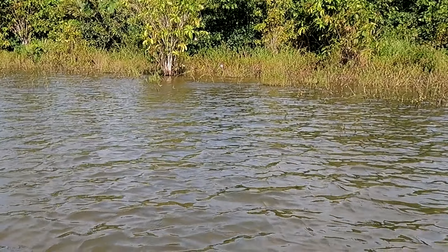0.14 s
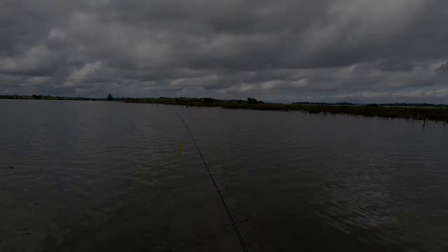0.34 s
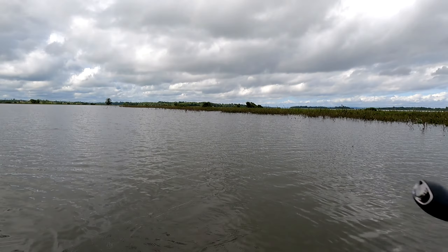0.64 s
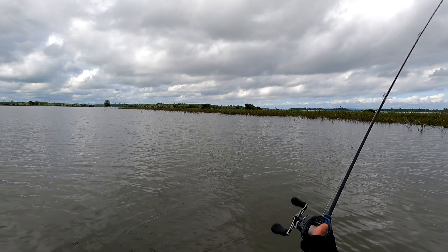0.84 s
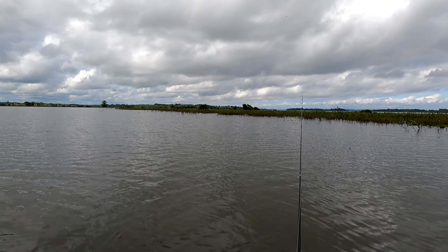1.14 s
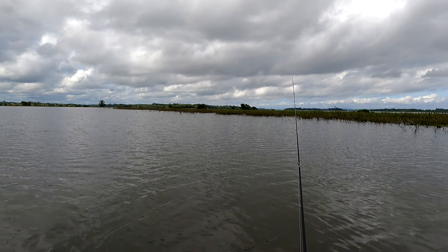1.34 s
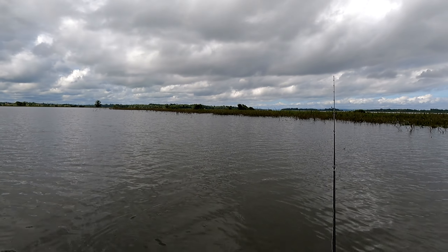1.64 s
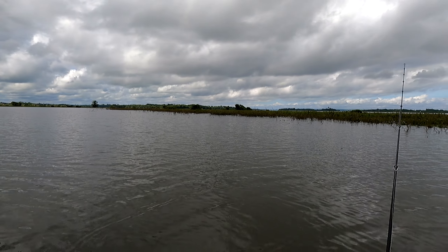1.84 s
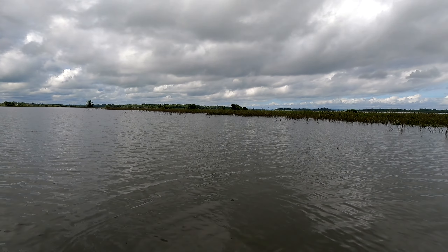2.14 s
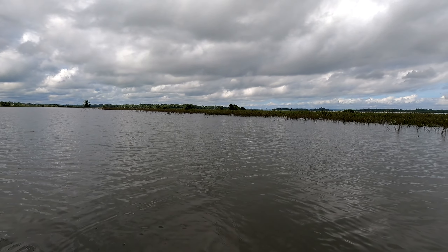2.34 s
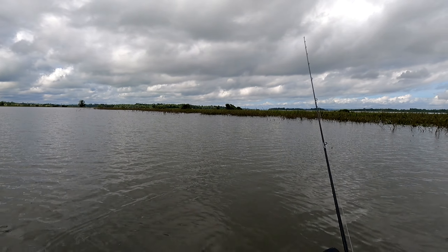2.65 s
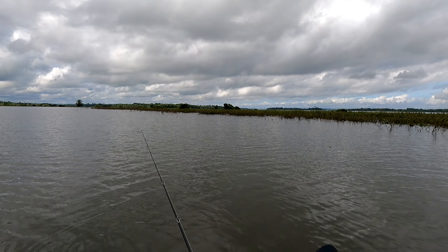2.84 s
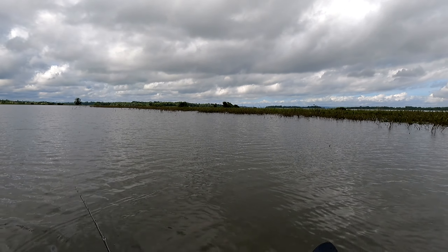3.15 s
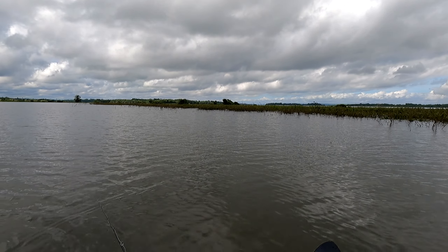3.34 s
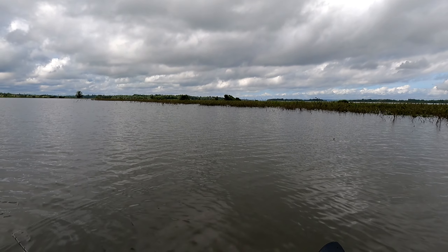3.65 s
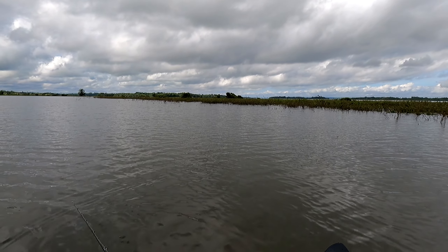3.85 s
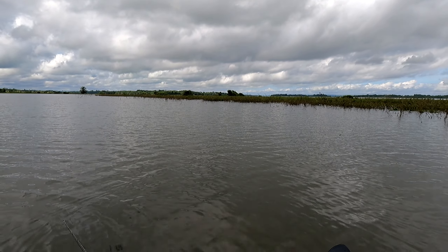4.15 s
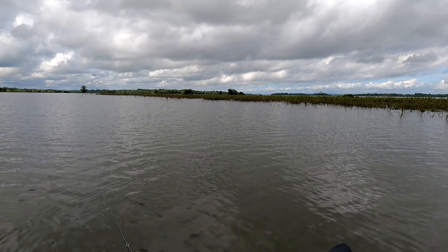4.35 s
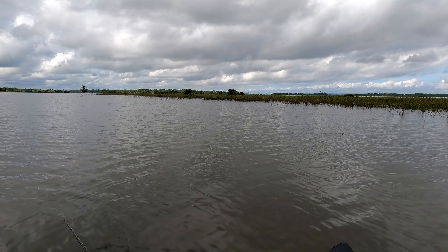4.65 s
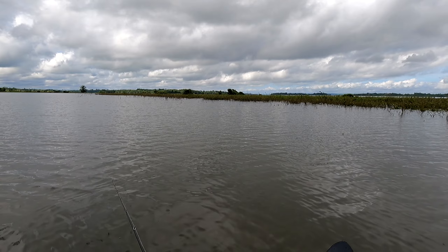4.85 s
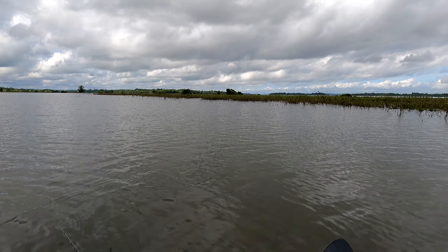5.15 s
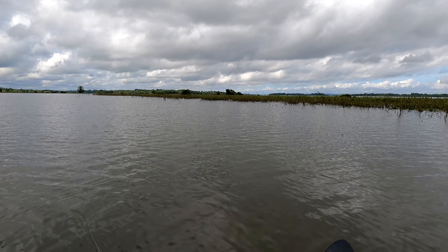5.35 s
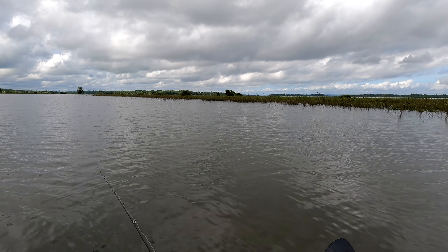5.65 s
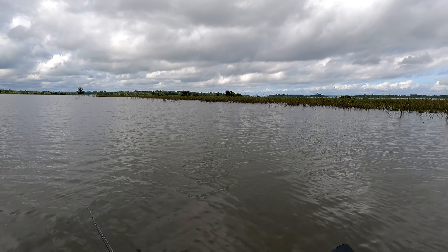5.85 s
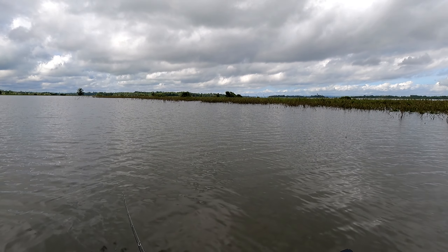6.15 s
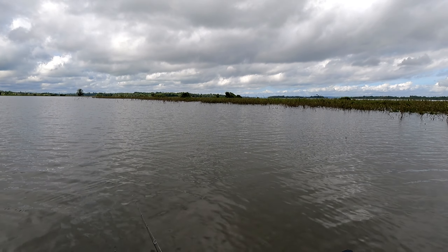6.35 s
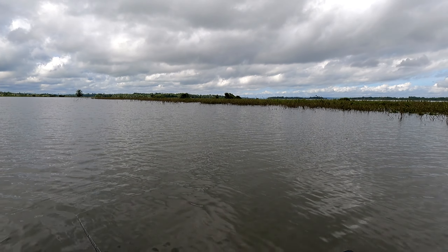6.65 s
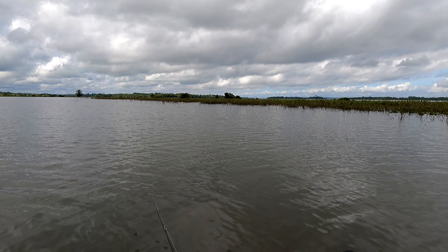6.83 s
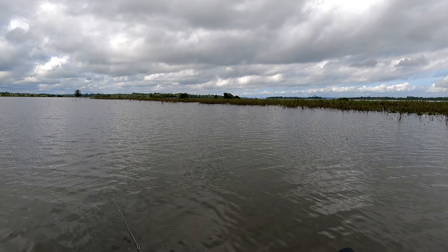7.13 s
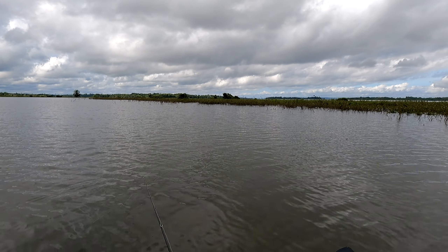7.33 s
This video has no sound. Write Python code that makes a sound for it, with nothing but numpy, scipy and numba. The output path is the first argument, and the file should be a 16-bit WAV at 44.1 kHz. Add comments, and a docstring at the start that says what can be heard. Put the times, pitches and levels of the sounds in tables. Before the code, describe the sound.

A rumbling wind buffet stops abruptly, then sleeve and rod rustle and swish, peaking in a sharp whoosh at the cast. The spool hisses brightly, fluttering lower as it slows, then stops with a dull patter. Sparse crisp ticks and one sharp click follow over a quiet lake. Later the reel rasps in short squeaky strokes, ending with a low hull knock. Close microphone, dry, outdoors.

```python
"""Casting a lure from a boat

An angler casts over a quiet lake. After a last gust on the microphone (shaped noise), sleeve and rod
swish (crackling noise bands) and the spool hisses as it slows (noise bands at multiples of its rate).
Line and tackle tick and patter (noise bursts, damped cycles), the reel rasps in short squeaky strokes
(resonant rubbing noise, gliding tones), knocks ring the hull's modes; lake and handling rumble lie below."""
import sys
import numpy as np
from scipy import signal
from scipy.fft import rfft, irfft, next_fast_len
from scipy.io import wavfile
from scipy.ndimage import uniform_filter1d
from numba import njit

SR = 44100
rng = np.random.default_rng(int(sys.argv[2]) if len(sys.argv) > 2 else 0)


def dump(signal):
    """Clip the signal to [-1, 1] and save it as 16-bit WAV at the path in sys.argv[1]."""
    limited = np.clip(np.atleast_2d(signal).T, -1, 1)
    pcm = np.round(limited * 32767).astype(np.int16)
    wavfile.write(sys.argv[1], SR, pcm)


N = 330309
T = np.arange(N) / SR  # s

# spectrum of cloth and bright ticks: (frequency [Hz], relative density [dB])
RUSTLE_SPECTRUM = [(24, -62), (40, -5.5), (124, 5), (588, -1), (701, -5), (775, 0.5), (1610, -9.5),
                   (2790, -12.5), (4610, -15), (7070, -8.5), (14700, -1), (16200, -8.5)]


def undb(db):
    """Amplitude of a level in dB."""
    return 10 ** (np.asarray(db) / 20)


def unit(x):
    """Scale to rms 1."""
    return x / np.sqrt(np.mean(x ** 2))


def curves(tables):
    """A gate open within the tables and 6 ms beyond, then their columns interpolated over time."""
    s, *columns = np.transpose([row for table in tables for row in table])
    inside = sum((T >= table[0][0] - .006) & (T <= table[-1][0] + .006) for table in tables) > 0
    return [inside] + [np.interp(T, s, c) for c in columns]


def colour(x, spectrum, lo_hz=1, hi_hz=1e6):
    """Shape x by (Hz, dB) points, kept between two steep edges."""
    size = next_fast_len(N)
    f = np.maximum(np.arange(size // 2 + 1) * SR / size, 1)
    hz, db = np.transpose(spectrum)
    shape = undb(np.interp(np.log(f), np.log(hz), db))
    edges = 1 / np.sqrt((1 + (lo_hz / f) ** 8) * (1 + (f / hi_hz) ** 8))
    return irfft(rfft(x, size) * shape * edges, size)[:N]


def walk(rate_hz):
    """Random levels, a new one every 1 / rate_hz, joined by straight slopes; spread near 1."""
    k = int(SR / rate_hz)
    held = np.repeat(rng.standard_normal(N // k + 1), k)
    return uniform_filter1d(held, k)[:N] * 1.15


def grains(rate_hz, spread_db):
    """Noise whose level jumps about: many tiny slips and creases."""
    return rng.standard_normal(N) * undb(spread_db * walk(rate_hz))


def swell(s, rise_s, fall_s):
    """Gain that is 20 dB down a rise before and a fall after its peak; both last at least 5 ms."""
    x = np.where(T < s, (s - T) / max(rise_s, .005), (T - s) / max(fall_s, .005))
    return undb(-20 * np.minimum(x, 8) ** 0.91)


@njit
def svf(x, hz, width):
    """Band-pass with a moving centre, gain 1 at the centre."""
    y, b, l = np.empty(len(x)), 0., 0.
    for i in range(len(x)):
        g, k = np.tan(np.pi * hz[i] / SR), width / hz[i]
        v = (b + g * (x[i] - l)) / (1 + g * (g + k))
        b, l, y[i] = 2 * v - b, l + 2 * g * v, k * v
    return y


def moves():
    """Creases crackle together in the upper bands, with random snaps; the air swish below is smoother."""
    # backswing and cast: (time [s], crisp rustle [dB], scrape [dB], air swish [dB])
    swing_rows = [
        [(0.32, -74, -67.5, -61.5), (0.42, -45.5, -53.5, -31), (0.526, -52.5, -41.5, -36),
         (0.588, -41.5, -35, -41.5), (0.73, -41, -40.5, -33.5), (0.818, -52, -45.5, -46.5),
         (0.86, -76, -68, -60)],
        [(0.86, -71, -63, -65), (0.944, -48.5, -43.5, -32), (1.048, -27, -18.5, -26), (1.088, -48.5, -51, -36),
         (1.13, -35, -31.5, -32.5), (1.18, -43, -44.5, -38.5), (1.248, -42.5, -41, -35),
         (1.452, -52.5, -45, -43), (1.52, -76, -59.5, -60)],
    ]
    # small shifts of arm and sleeve:
    # (peak [s], rise [s], fall [s], crisp rustle [dB], scrape [dB], air swish [dB])
    shift_rows = [(2.124, 0.12, 0.59, -67, -61.5, -56), (2.68, 0.12, 0.013, -63, -75, -43.5),
                  (2.792, 0.043, 0.043, -82, -87, -52), (3.034, 0.14, .12, -52, -56, -46),
                  (3.388, 0.033, 0.034, -40.5, -45, -42), (3.57, 0.048, 0.084, -62.5, -55.5, -52.5),
                  (4.066, 0.46, 0.29, -71.5, -64, -81), (4.65, 0.18, 0.35, -81, -70, -64),
                  (5.026, 0.13, 0.11, -71, -58.5, -62), (5.296, 0.28, 0.13, -73, -64.5, -59),
                  (6.66, .05, 0.19, -66, -62, -53.5), (6.85, 0.27, 0.53, -65, -57.5, -76),
                  (7.124, 0.32, 0.04, -66, -58.5, -62)]
    # faint stir between them: (time [s], crisp rustle [dB], scrape [dB], air swish [dB])
    stir_rows = [(1.5, -59, -59, -58.5), (2.25, -56, -62.5, -58), (2.6, -63, -61.5, -61.5),
                 (2.72, -69, -64, -56), (4.4, -84.5, -70, -69), (5.4, -81, -69, -71),
                 (7.49, -84, -72.5, -64)]
    base_hz, base_scrape_db, db_per_octave = 524, -43.5, 17
    snaps_per_s, snap_decay_s = 45, 0.0018

    swinging, *swing_db = curves(swing_rows)
    resting, *stir_db = curves([stir_rows])
    gain = swinging * undb(swing_db) + resting * undb(stir_db)
    for s, rise_s, fall_s, *db in shift_rows:
        gain = gain + undb(db)[:, None] * swell(s, rise_s, fall_s)

    snaps = (rng.random(N) < snaps_per_s / SR) * undb(np.minimum(4 * rng.exponential(size=N), 8))
    snaps = signal.lfilter([1], [1, -np.exp(-1 / (snap_decay_s * SR))], snaps)
    creases = grains(260, 0.57) * (1 + 1.06 * snaps)
    crisp = colour(creases, RUSTLE_SPECTRUM, 4500)
    crisp = crisp / np.std(colour(creases, RUSTLE_SPECTRUM, 2400, 8330))
    scrape = unit(colour(creases, RUSTLE_SPECTRUM, 1250, 4800))

    # the harder the swing (louder its scrape), the higher its swish
    swish_hz = base_hz * 2 ** (np.maximum(swing_db[1] - base_scrape_db, -8) / db_per_octave)
    air = grains(70, 1.9)
    bands_hz = [(45, 208), (250, 450), (600, 1200)]
    swish = unit(sum(undb(2.4 * walk(11)) * colour(air, RUSTLE_SPECTRUM, *band) for band in bands_hz))
    swish = unit(swish + 1.27 * unit(svf(air, swish_hz, 420.0)))
    return gain[0] * crisp + gain[1] * scrape + gain[2] * swish


def spool():
    """Bands at multiples of the slowing bearing rate stand out of the hiss, which throbs twice a turn."""
    # free run: (time [s], bearing rate [Hz], hiss [dB])
    run_rows = [(1.1, 1523, -70), (1.2, 1478, -42), (1.4, 1375, -37), (1.55, 1298, -42), (1.8, 1053, -39.5),
                (2.0, 928, -40.5), (2.12, 868, -37.5), (2.25, 830, -45), (2.55, 722, -54.5),
                (2.62, 705, -77)]
    # hiss colour: (frequency [Hz], relative density [dB])
    body_spectrum = [(3820, -38), (6500, -43), (6910, -22), (9170, 1), (10600, -6), (12100, 2),
                     (13100, -2.5), (14600, -7), (15100, -8), (16200, -23)]
    # whine partials: (multiple of the turning rate [-], relative level [dB])
    whine_rows = [(5, -3), (12, 2.5), (16, -3), (24, -8), (27, -20)]
    whine_peak_s, whine_rise_s, whine_fall_s, whine_db = 1.76, 2.5, 0.5, -64

    run_s, *columns = np.transpose(run_rows)
    bearing_hz, hiss_db = (np.interp(T, run_s, c) for c in columns)
    noise = grains(360, 2.0)
    bands = np.zeros(N)
    for k in (6, 8, 10, 12, 14, 16):
        band_hz = np.minimum(k * bearing_hz * (1 + .012 * walk(9)), .45 * SR)
        bands += undb(3 * walk(6)) * svf(noise, band_hz, 560.)
    turns = np.cumsum(bearing_hz) / SR / 12  # 12 bearing cycles a turn
    throb = 0.56 + np.exp(-(turns % 1) / 0.13) + 0.42 * np.exp(-((turns + .5) % 1) / 0.074)
    hiss = colour((bands + .7 * noise) * throb, body_spectrum)
    hiss = hiss / np.std(hiss[int(1.5 * SR):2 * SR])  # level set by mid-run

    whine = np.zeros(N)
    for k, db in whine_rows:
        whine += undb(db + walk(13.6)) * np.sqrt(2) * np.sin(2 * np.pi * int(k) * turns)
    whine_gain = undb(whine_db) * swell(whine_peak_s, whine_rise_s, whine_fall_s)
    running = (T > run_s[0]) & (T < run_s[-1])
    return running * (undb(hiss_db) * hiss + whine_gain * whine)


def ticks():
    """Clusters of tiny slips in three bands, each tick with its own bright colour; low bands ring longer."""
    # line, guides and tackle:
    # (time [s], peak [dB], mid part re high part [dB], low part re high part [dB])
    tick_rows = [(0.1186, -32.5, 9.5, -22), (0.1616, -54.5, 21, -7), (0.2823, -44.5, 16.5, 2),
                 (0.416, -18.5, -19, -4), (0.5003, -23.5, -17, -12), (0.6204, -11, -24, -6),
                 (0.809, -16, -28, -15), (0.9345, -17.5, -9, 1.5), (1.0519, -15, 2, 4.5),
                 (1.1262, -13, -23, -10), (1.2114, -11.5, -20, -15), (2.0147, -12, -43, -41),
                 (2.0567, -10.5, -29, -37), (2.0752, -17.5, -38, -33), (2.1077, -20, -31, -16),
                 (2.124, -17.5, -39, -35), (2.138, -19, -39, -36), (2.326, -27, -14, -25),
                 (2.3506, -30, -26, -26), (2.615, -27.5, -6, -17), (2.6383, -19.5, -28, -4),
                 (2.6795, -30, -27, -14), (2.7718, -28, -35, -7), (2.8866, -25, -25, -23),
                 (2.9632, -21.5, -20, -28), (3.004, -21, -16, -20), (3.1712, -25, -18, -9),
                 (3.2655, -33, -14, 6), (3.2786, -42.5, 0, 3), (3.367, -25.5, -3, -5),
                 (3.3774, -21.5, -4, -25), (3.3845, -4.5, -11, -15), (3.3962, -23.5, 1.5, -4),
                 (3.461, -35.5, -9, -16), (3.4864, -50.5, -4, 17), (3.5503, -27, -17, -7),
                 (3.564, -35, -7, 2), (3.7013, -33.5, -11, -5.5), (3.826, -31, -24, -25),
                 (3.8967, -32.5, -30, -28), (3.9727, -41, 7.5, -5), (3.9907, -20, -18.5, -18),
                 (4.1852, -28.5, -5, -14), (4.2057, -33, -2.5, -5), (4.4004, -42.5, -6, 4.5),
                 (4.6567, -38, -4, -11), (4.6752, -36.5, -1, -5), (4.7111, -37.5, -5, -3),
                 (4.786, -32, -9.5, -3.5), (5.8148, -4, -7.5, -25), (5.8215, -14.5, 0.5, -9.5),
                 (5.8302, -9, -3, -26), (5.915, -5, -37, -37), (5.984, -12.5, -33, -43),
                 (6.1757, -28, -19, -32), (6.562, -20, 0, -2), (6.5912, -11, 2.5, 3),
                 (6.6538, -41.5, 10, 5), (6.6672, -42, 10, -12), (6.706, -42, 0, -10),
                 (6.8947, -28, -11, -14), (7.085, -29.5, -22, -3), (7.094, -24, -20, -18),
                 (7.106, -26, -4, -7)]
    # ring of reel and tackle: (frequency [Hz], relative density [dB])
    tackle_spectrum = [(180, -42), (300, -0.5), (580, -14), (751, -2.5), (1110, -10.5), (1950, -1),
                       (2650, -10.5), (2980, -6.5), (3730, -15), (5000, -16.5), (6500, -27), (11000, -120)]
    high_t60_s, bright_mean_hz, bright_spread_hz = 0.021, 12500, 1900
    # faint bright ticks fall at random while the line settles
    settle_start_s, settle_end_s, settle_first_db, settle_last_db = 2.2, 4.2, -31, -42
    settle_count, settle_mid_db, settle_low_db = 9, -26, -27
    slips_per_s, slip_decay_s, onset_delay_s = 600, 0.00048, 0.00077
    crest_db = 13  # peaks stand this far over the rms

    faint = []
    for p, q in rng.random((settle_count, 2)):
        s = settle_start_s + p * (settle_end_s - settle_start_s)
        db = settle_first_db + p * (settle_last_db - settle_first_db) + 6 * (q - .5)
        faint.append((s, db, settle_mid_db, settle_low_db))
    rows = sorted(tick_rows + faint)
    tick_hz = bright_mean_hz + bright_spread_hz * rng.standard_normal(len(rows))

    envelopes, bright_hz = np.zeros((3, N + SR)), np.full(N, 9000.)
    slips = (rng.random(N) < slips_per_s / SR) * 1.
    lead = SR // 50
    t = np.arange(-lead, SR // 8) / SR
    for (s, db, mid_db, low_db), hz in zip(rows, tick_hz):
        i = int((s + onset_delay_s) * SR)
        slips[i] = 2
        bright_hz[i - SR // 300:] = np.clip(hz, 4500, 16000)
        for envelope, rel_db, longer in zip(envelopes, (0, mid_db, low_db), (1, 1.3, 1.8)):
            ring_s = high_t60_s * longer
            # each tick swells briefly, peaks, then dies away about twice as slowly
            x = np.abs(np.where(t > 0, t / ring_s, t / (.5 * ring_s)))
            envelope[i - lead:i - lead + len(t)] += undb(db + rel_db - 60 * x ** 1.02)

    clusters = signal.lfilter([1], [1, -np.exp(-1 / (slip_decay_s * SR))], slips)
    snaps = rng.standard_normal(N) * (0.84 + 0.86 * clusters)
    high = unit(colour(snaps, RUSTLE_SPECTRUM, 4500)) + 0.57 * unit(svf(snaps, bright_hz, 7400.0))
    mid = unit(colour(snaps, tackle_spectrum, 1470, 6900))
    low = unit(colour(snaps, tackle_spectrum, 330, 870))
    return sum(undb(-crest_db) * e[:N] * b for e, b in zip(envelopes, (unit(high), mid, low)))


def patter():
    """Each pat is a few damped cycles with a rough edge."""
    # dull patter as the spool is stopped: (start [s], number of pats [-], mean level [dB])
    patter_rows = [(2.609, 6, -33.5), (2.794, 2, -41.5), (3.426, 1, -40)]
    gap_s, mean_hz, scatter = .0145, 440, .1  # scatter: of log pitch, and of time in gaps
    t60_s, attack_s, level_spread_db = 0.037, 0.0007, 1.7

    out, t = np.zeros(N), np.arange(SR // 20) / SR
    pats = [(s + k * gap_s, db) for s, count, db in patter_rows for k in range(int(round(count)))]
    edge_band = signal.butter(4, (550, 1550), "band", fs=SR, output="sos")
    for (s, db), noise in zip(pats, rng.standard_normal((len(pats), len(t)))):
        # the last noise samples also serve as random draws
        hz = mean_hz * np.exp(scatter * noise[-1])
        s, db = s + scatter * gap_s * noise[-2], db + level_spread_db * noise[-3]
        edge = .6 * unit(signal.sosfilt(edge_band, noise))
        envelope = undb(db - 60 * t / t60_s) * np.minimum(t / attack_s, 1)
        out[int(s * SR):int(s * SR) + len(t)] += (np.sin(2 * np.pi * hz * t) + edge) * envelope
    return out


def strokes():
    """Rubbing noise rings one resonance that follows the stroke and others that drift, come and go."""
    # reel strokes: (peak [s], hiss rise [s], hiss fall [s], hiss [dB],
    # rasp re hiss [dB], low rub re hiss [dB], rasp resonance at the peak [Hz])
    stroke_rows = [(5.476, 0.052, 0.27, -44.5, -0.5, -11, 3200), (5.598, 0.1, 0.054, -34, 3.5, -11.5, 3180),
                   (5.662, 0.041, 0.045, -26, -1, -10.5, 3020), (5.758, 0.035, 0.026, -30, 6.5, -20, 2250),
                   (5.91, 0.21, 0.029, -38, -10.5, -4, 2620), (5.986, 0.026, 0.11, -31.5, -15, -17.5, 2100),
                   (6.092, 0.046, 0.099, -32.5, -2, -15, 3280), (6.176, 0.01, 0.15, -32.5, -9, -16, 3000),
                   (6.254, .1, 0.018, -42, 2.5, -21, 3630), (6.34, 0.042, 0.044, -33.5, 1, -11, 3140),
                   (6.446, 0.039, 0.085, -41, 3, -6.5, 2820), (6.52, 0.076, 0.081, -39.5, -28, -35, 2920),
                   (6.6, 0.023, 0.021, -28.5, 2, 3, 1960)]
    # rubbing colour: (frequency [Hz], relative density [dB])
    rasp_spectrum = [(29, -41), (50, -7), (81, 10), (108, -2.5), (299, -5.5), (346, -3), (562, -4.5),
                     (769, -5.5), (1130, -8.5), (2400, -4.5), (4180, -9.5), (7120, -11.5), (8430, -9.5),
                     (14000, -4), (16200, -10.5)]
    # reel resonances, scaled below: (nominal centre [Hz], nominal width [Hz], relative level [dB])
    reel_rows = [(2370, 470, 2.5), (3580, 110, -3), (4200, 120, -3), (1370, 83, -11), (8270, 270, -6.5)]
    rasp_lingers, rub_lingers = 1.125, 1.5  # times the length of the hiss
    ring_sag = .15  # share of pitch lost at the ends

    hiss_gain, rasp_gain, rub_gain, arch = np.zeros((4, N))
    for s, rise_s, fall_s, db, rasp_db, rub_db, _ in stroke_rows:
        slow = swell(s, rub_lingers * rise_s, rub_lingers * fall_s)
        hiss_gain += undb(db) * swell(s, rise_s, fall_s)
        rasp_gain += undb(db + rasp_db) * swell(s, rasp_lingers * rise_s, rasp_lingers * fall_s)
        rub_gain += undb(db + rub_db) * slow
        arch = np.maximum(arch, slow)
    sag = 1 - ring_sag * (1 - arch)
    columns = np.transpose(stroke_rows)
    ring_hz = np.interp(T, columns[0], columns[-1]) * sag

    slips = grains(350, 1.9)
    body = np.zeros(N)
    for hz, width_hz, db in reel_rows:
        drifting_hz = hz * sag * (1.05 + .1 * walk(15))
        body += undb(db + 4 * walk(18)) * unit(svf(slips, drifting_hz, 1.5 * width_hz))
    ring = unit(svf(svf(slips, ring_hz, 600.), ring_hz, 600.))
    hiss = unit(colour(slips, rasp_spectrum, 6200))
    rasp = unit(colour(slips, rasp_spectrum, 1500, 4800)) + undb(-1.5) * ring + undb(5.5) * unit(body)
    rub = unit(colour(slips, rasp_spectrum, 138, 1340))
    return hiss_gain * hiss + rasp_gain * unit(rasp) + rub_gain * rub


def squeaks():
    """Stick-slip near one pitch: a gliding sine plus narrow noise under a soft arch."""
    # reel squeaks: (start [s], length [s], start pitch [Hz], end pitch [Hz], sine level [dB])
    squeak_rows = [(5.542, 0.092, 730, 834, -38.5), (5.612, 0.024, 607, 400, -40),
                   (5.637, 0.0089, 760, 800, -33), (5.676, 0.017, 957, 915, -31.5),
                   (5.732, 0.052, 695, 790, -40), (5.97, 0.031, 1783, 2050, -46),
                   (6.045, 0.029, 2060, 2390, -42), (6.047, 0.027, 1280, 1250, -47.5),
                   (6.068, 0.06, 3440, 3290, -37.5), (6.215, 0.056, 4040, 3600, -41.5),
                   (6.227, 0.038, 674, 690, -47.5), (6.318, 0.04, 679, 694, -43),
                   (6.43, 0.052, 483, 503, -53)]
    out, noise = np.zeros(N), rng.standard_normal(N)
    for s, length_s, start_hz, end_hz, db in squeak_rows:
        i, n = int(s * SR), int(length_s * SR)
        hz = np.linspace(start_hz, end_hz, n)
        sine = np.sqrt(2) * np.sin(2 * np.pi * np.cumsum(hz) / SR)
        rough = 1.04 * unit(svf(noise[i:i + n], hz, 0.059 * start_hz))
        arch = np.sin(np.linspace(0, np.pi, n)) ** 0.48
        out[i:i + n] += undb(db) * arch * (sine + rough)
    return out


def knocks():
    """Half-sine pushes ring the hull's modes."""
    # knocks on the hull: (time [s], relative push [dB], contact [s])
    knock_rows = [(6.558, -10.5, 0.0027), (6.567, -18, 0.0078), (6.600, -16.5, 0.001)]
    # hull modes: (frequency [Hz], relative level [dB], t60 [s])
    hull_rows = [(57.4, -3.5, 0.14), (85, 6.5, 0.05), (131, 4.5, 0.061), (253, 1, 0.034), (346, 6.5, 0.037),
                 (458, 2, 0.046), (890, -16, .04)]
    push = np.zeros(N)
    for s, db, contact_s in knock_rows:
        i, n = int(s * SR), int(contact_s * SR)
        push[i:i + n] += undb(db) * np.sin(np.linspace(0, np.pi, n)) / n
    out = np.zeros(N)
    for k, (hz, db, t60_s) in enumerate(hull_rows):
        pole = np.exp(2j * np.pi * hz / SR - np.log(1000) / (t60_s * SR))
        out += (-1) ** k * undb(db) * signal.lfilter([1], [1, -pole], push).imag
    return out


GUST_END_S = .312


def gust():
    """Rumble and hiss of wind, only partly alike at the two microphone ports, stopping short."""
    # gust; the last row is held to GUST_END_S: (time [s], rumble [dB], splashy hiss re rumble [dB])
    gust_rows = [(0.0, -38.5, -12), (0.072, -40.5, -12), (0.194, -47.5, -7.5), (0.294, -38.5, -8),
                 (0.31, -45.5, -7)]
    # hiss colour: (frequency [Hz], relative density [dB])
    hiss_spectrum = [(210, -40), (350, 0), (768, -8), (942, -13), (1210, -4), (2620, 0), (7390, -16.5),
                     (15000, -54.5)]
    rumble_spectrum = [(15, 4), (40, 6.5), (90, 1.5), (250, -13.5), (500, -37.5)]  # (Hz, relative dB)
    alike = 0.71  # share of power common to both ports

    # the last row is reached at GUST_END_S
    inside, low_db, hiss_db = curves([gust_rows[:-1] + [(GUST_END_S, *gust_rows[-1][1:])]])

    def turbulence():
        rumble = unit(colour(grains(59.6, 5.1), rumble_spectrum))
        hiss = unit(colour(grains(144.7, 2.8), hiss_spectrum))
        return rumble + undb(hiss_db) * hiss

    mid, side = turbulence(), turbulence()
    ports = np.sqrt(alike) * mid + np.sqrt(1 - alike) * side * np.array([[1], [-1]])
    return inside * undb(low_db) * ports


def buffets():
    """Single slow pressure swings over a faint wavering hum, all stronger at one port."""
    # puffs within the gust, before port gains: (time [s], level [dB], length [s])
    puff_rows = [(0.062, -29, 0.02), (0.134, -31.5, 0.013), (0.282, -36.5, 0.015), (0.295, -36.5, 0.0092)]
    hum_hz, hum_db = 240, -55  # level before port gains
    out = (T < GUST_END_S) * undb(hum_db + 2 * walk(29)) * np.sin(2 * np.pi * hum_hz * T)
    for s, db, length_s in puff_rows:
        x = (T - s) / (length_s / 3.6)
        out = out + undb(db) * (1 - x ** 2) * np.exp(-x ** 2 / 2)
    return out * np.array([[1.3], [.7]])


def lake():
    """Air, lapping water and microphone hiss: octave bands swell together, flicker alone; low rumble."""
    # background colour: (frequency [Hz], relative density [dB])
    lake_spectrum = [(15, -26), (25, -10.5), (70, 15), (181, 3.5), (407, -9.5), (823, -25), (2070, -36),
                     (2570, -34.5), (3650, -28), (4540, -29), (10800, -46), (14100, -34), (16200, -29)]
    # low handling rumble, rising with the cast and the reeling; its span gates the whole layer:
    # (time [s], level [dB])
    rumble_rows = [(0.32, -63), (1.28, -53.5), (1.6, -63), (2.1, -58), (2.84, -59.5), (3.75, -66),
                   (4.33, -67), (4.83, -60.5), (5.35, -60.5), (5.77, -49), (5.99, -55), (6.49, -58),
                   (6.7, -62.5), (7.49, -59.5)]
    lake_db = -64
    common, noise = walk(1.0), rng.standard_normal(N)
    edges_hz = 130 * 2. ** np.arange(8)
    bands = np.zeros(N)
    for lo_hz, hi_hz in zip(edges_hz, edges_hz[1:]):
        bands += colour(noise, lake_spectrum, lo_hz, hi_hz) * undb(0.4 * common + 4.4 * walk(12))
    inside, rumble_db = curves([rumble_rows])
    rumble = undb(rumble_db) * unit(colour(grains(8.1, 1.4), lake_spectrum, 1, 128))
    return inside * (undb(lake_db) * unit(bands) + rumble)


def scene():
    """Sum of all layers; gust and buffets differ between the two channels."""
    cast = moves() + spool() + ticks() + patter()
    reel = strokes() + squeaks()
    return cast + reel + knocks() + gust() + buffets() + lake()


def record(dry):
    """The recorder cuts the top steeply."""
    top_hz = 15720
    return signal.sosfilt(signal.ellip(10, .2, 80, top_hz, fs=SR, output="sos"), dry)


dry = scene()
out = record(dry)
dump(out)
```